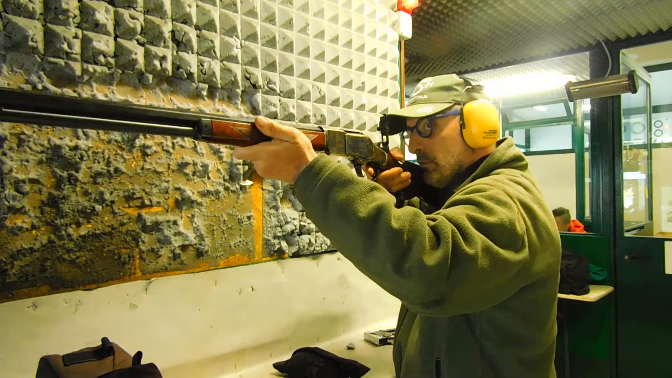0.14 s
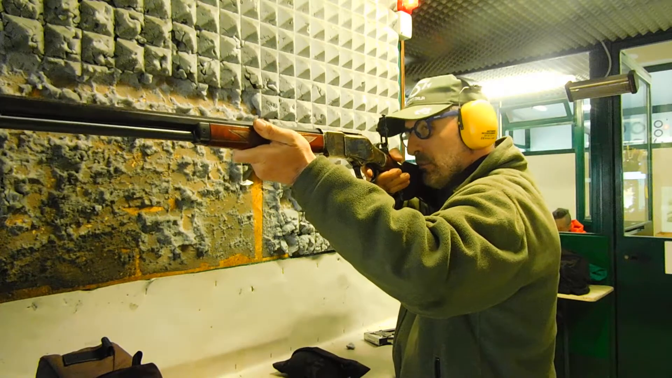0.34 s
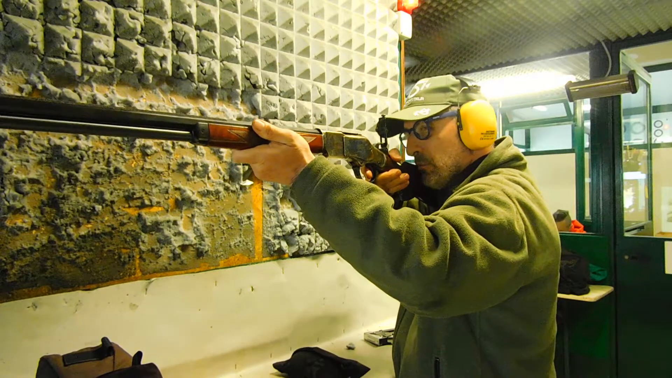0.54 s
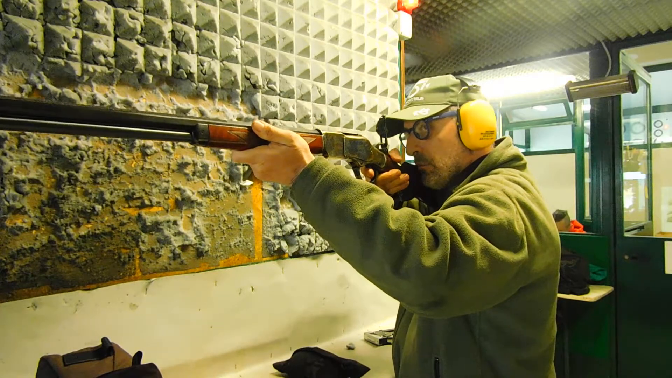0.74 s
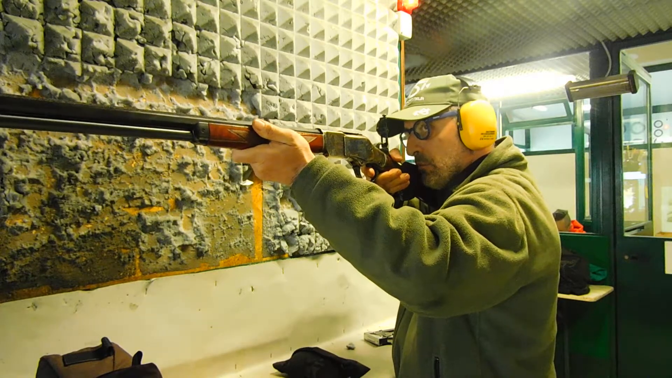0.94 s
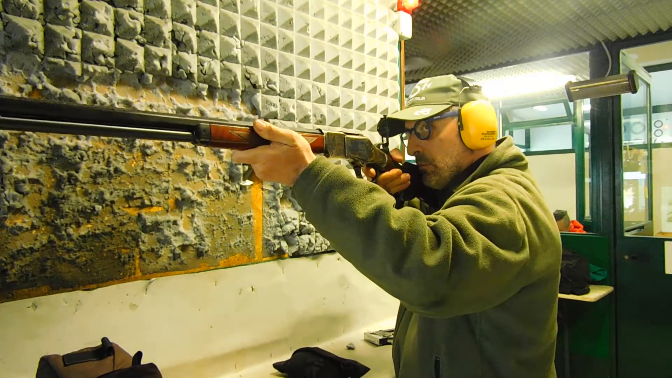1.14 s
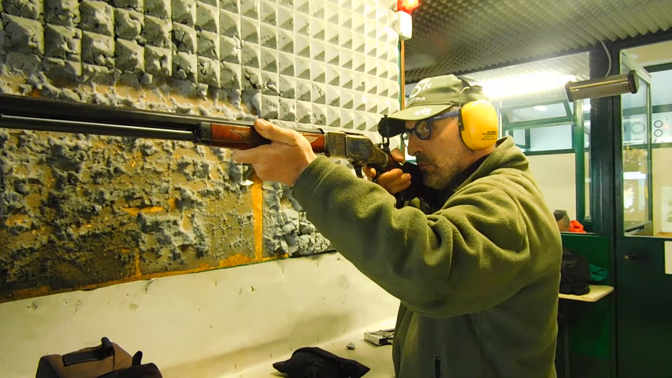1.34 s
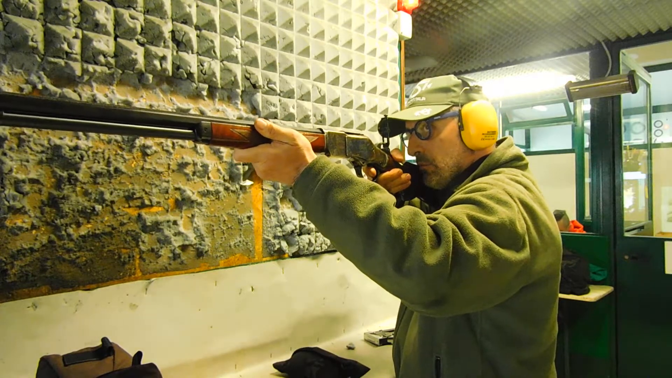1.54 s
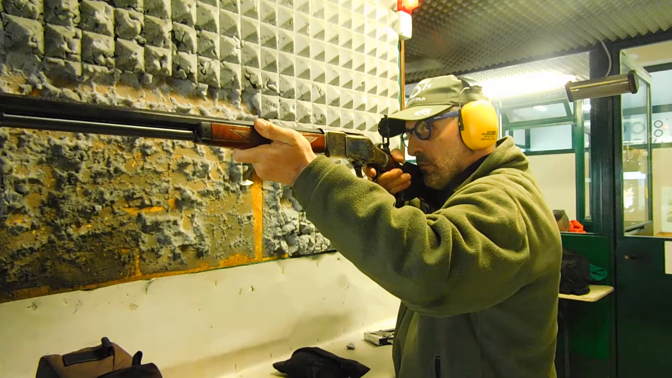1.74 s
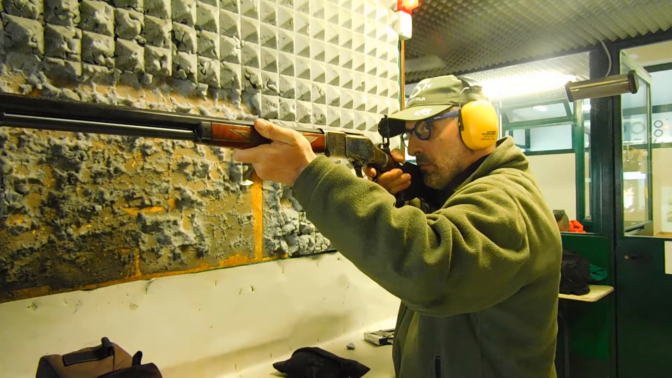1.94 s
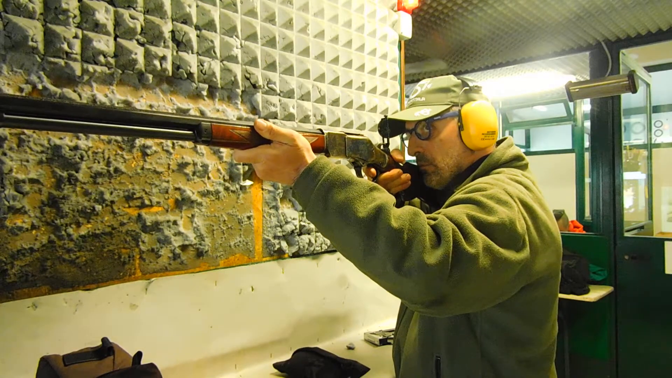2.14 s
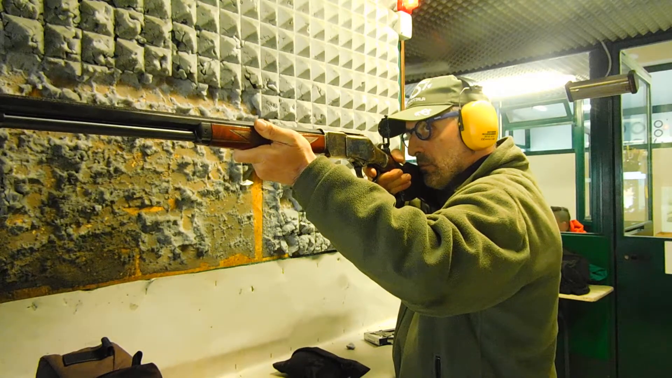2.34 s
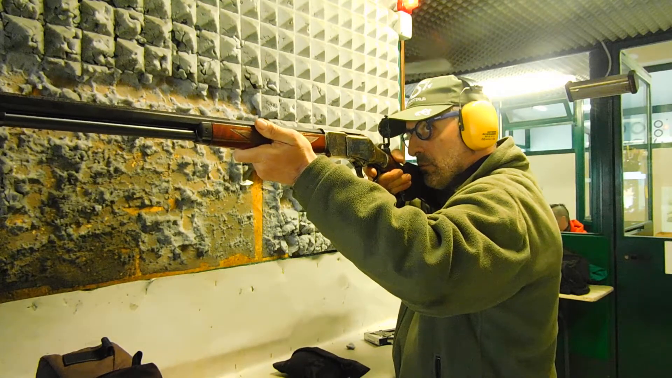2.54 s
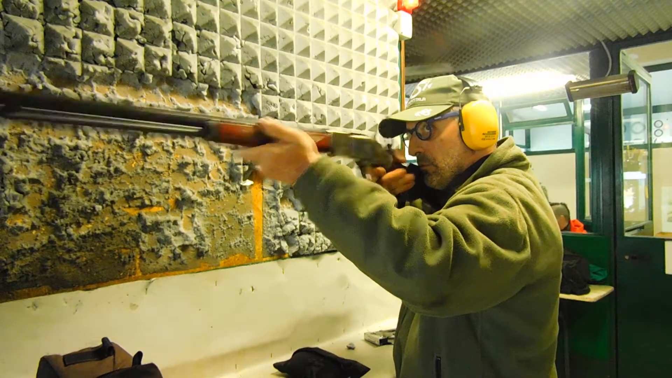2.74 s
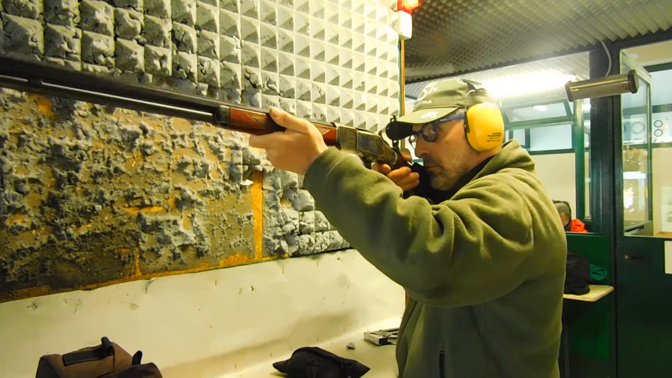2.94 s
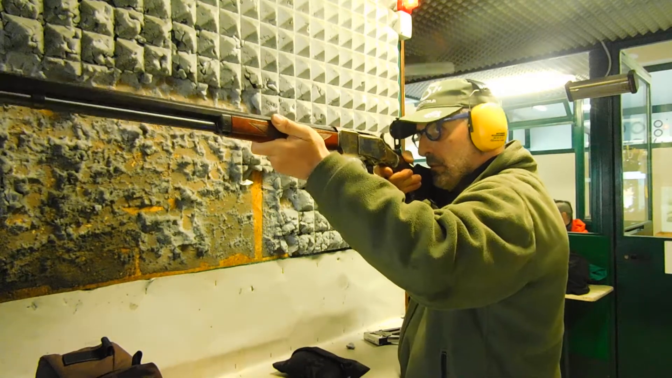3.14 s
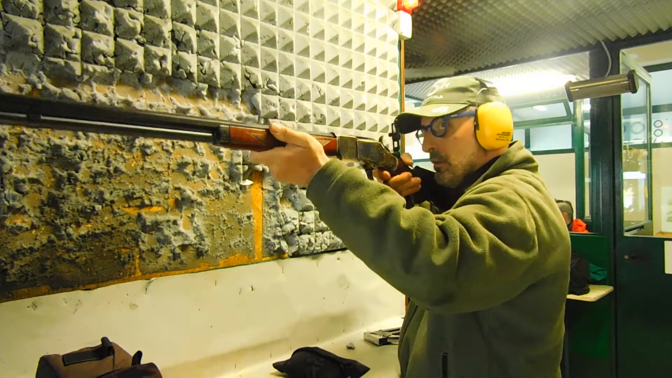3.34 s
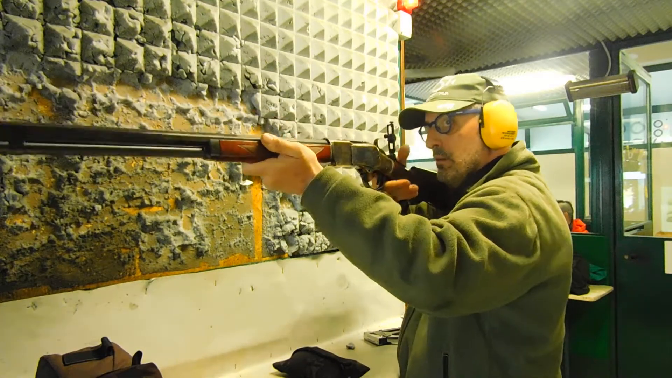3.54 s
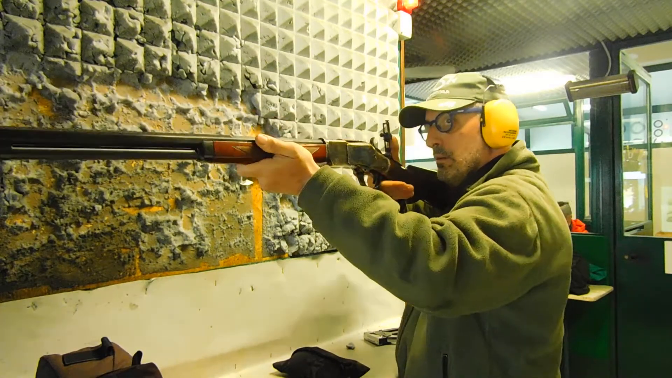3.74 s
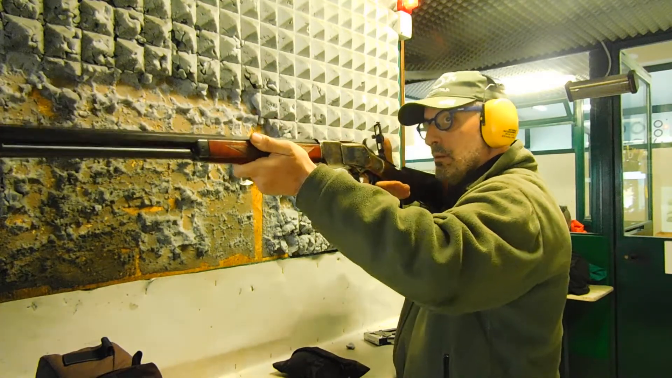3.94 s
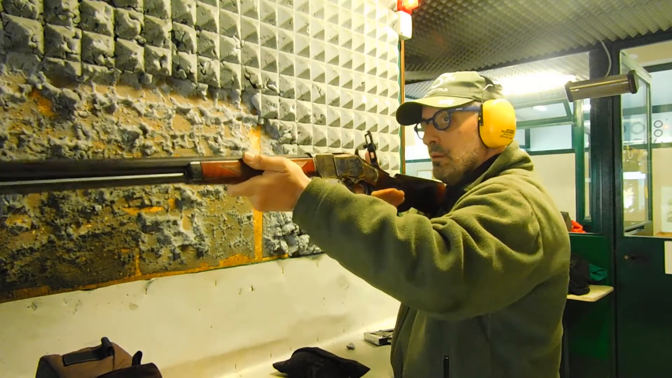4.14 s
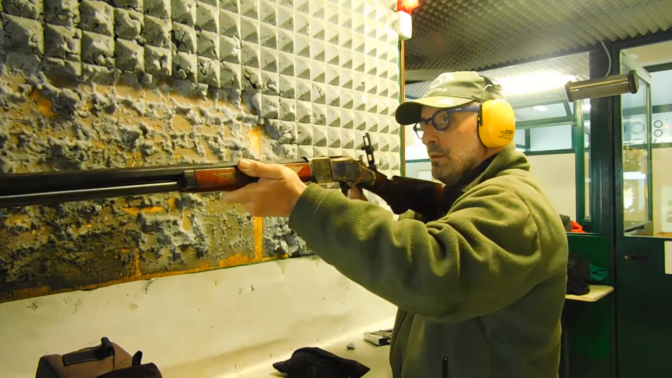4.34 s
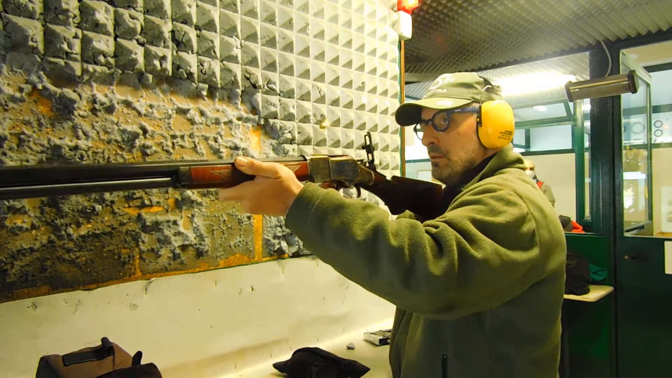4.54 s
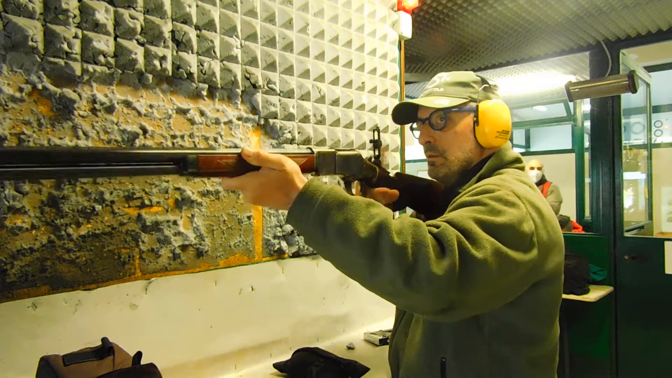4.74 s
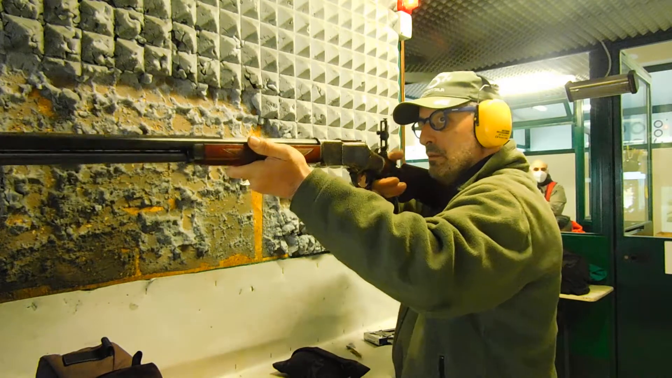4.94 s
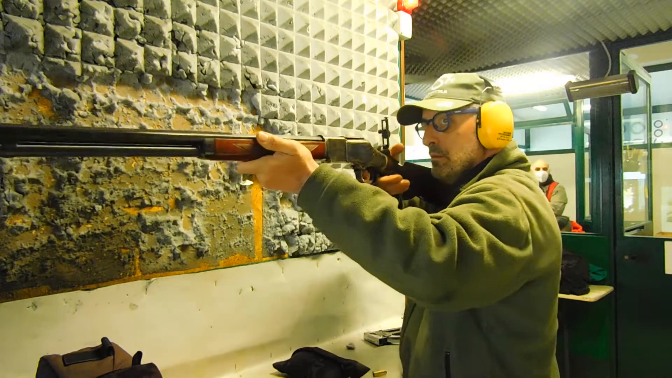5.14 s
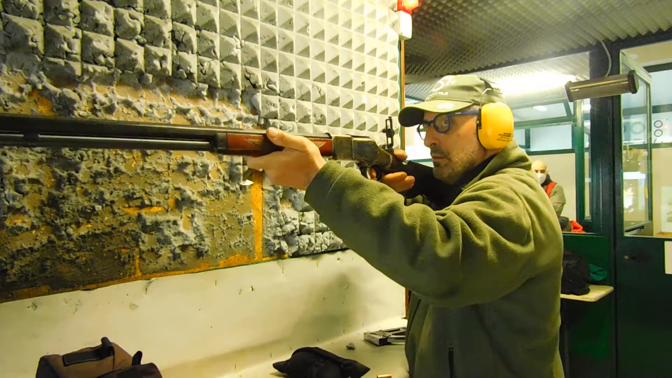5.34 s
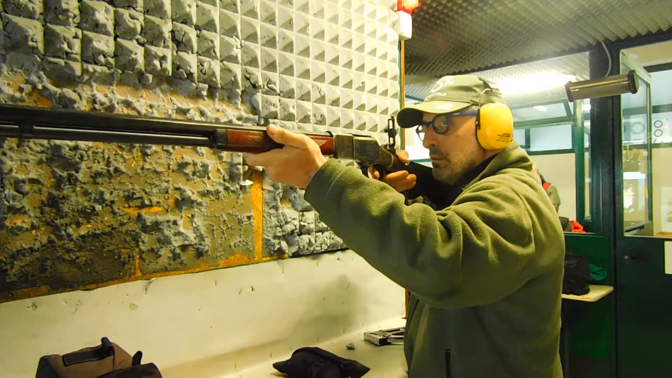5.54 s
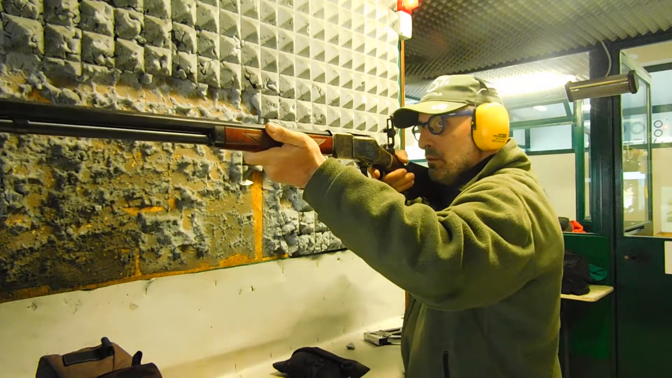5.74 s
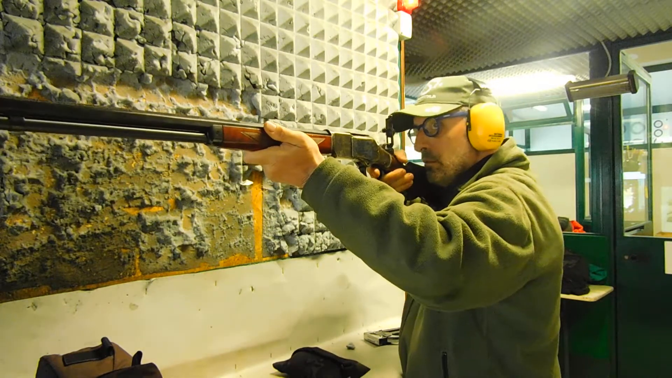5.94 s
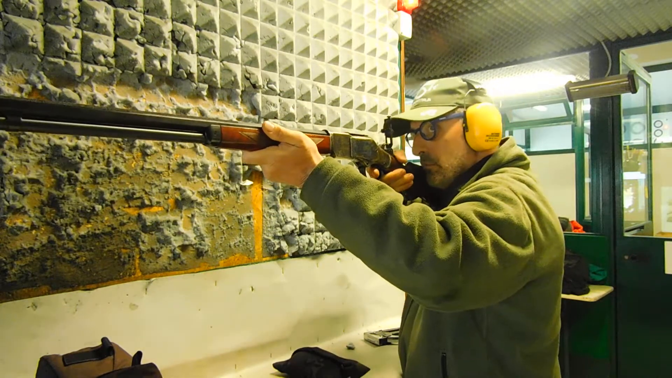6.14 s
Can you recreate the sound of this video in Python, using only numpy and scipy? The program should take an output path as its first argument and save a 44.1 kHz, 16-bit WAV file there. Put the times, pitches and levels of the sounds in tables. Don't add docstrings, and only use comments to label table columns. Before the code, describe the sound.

Lever-action rifle fires very close in an echoing indoor range, overloading the microphone; a duller distant shot precedes it, steel lever clacks follow.

```python
import sys
import numpy as np
from scipy import signal
from scipy.fft import rfft, irfft
from scipy.io import wavfile
from scipy.ndimage import uniform_filter1d

SR = 44100
rng = np.random.default_rng(int(sys.argv[2]) if len(sys.argv) > 2 else 0)


def generate_wav(signal):
    frames = np.transpose(np.atleast_2d(signal))
    scaled = np.clip(frames, -1, 1) * 32767
    pcm = np.round(scaled).astype(np.int16)
    wavfile.write(sys.argv[1], SR, pcm)


def natural_amplitude(level_db):
    exponent = np.asarray(level_db, float) / 20
    return 10 ** exponent


N = 272538

# pitch_hz, level_db per Hz
AIR_COLOUR = [(22, -31.5), (34, -8), (45, 14.5), (60, -12), (120, -4), (250, -4.5), (400, -6.5), (700, -12),
              (1100, -15), (1700, -22.5), (3000, -37.5), (5000, -50), (8000, -61), (16000, -80)]
# pitch_hz, width_hz, level_db
DUCT_HUMS = [(44.7, 27, -57), (103, 6.7, -55.5), (165.5, 10.4, -44)]
# pitch_hz, likeness_0_to_1
LIKENESS = [(60, 1.0), (130, 1.0), (290, 0.96), (640, 0.78), (1410, 0.79), (3100, 0.53), (6820, 0.4),
            (15000, 0.01)]
# pitch_hz, t60_s
TUNNEL_T60 = [(40, 2.24), (150, 1.35), (500, 1.22), (1200, 1.138), (3000, 1.03), (8000, 0.88),
              (16000, 1.75)]
# pitch_hz, level_db per Hz
FAR_COLOUR = [(18, -22.5), (40, -8.5), (161, 4.5), (345, -7), (1100, -10), (2120, -20.5), (6050, -55.5),
              (16000, -80.5)]
# pitch_hz, level_db per Hz
NEAR_COLOUR = [(20, -28.5), (45, -8.5), (100, -13.5), (160, -7.5), (260, -17.5), (560, -12.5), (800, -8.5),
               (1130, -8), (1600, -15), (2500, -23), (4000, -32.5), (6700, -51), (16000, -65.5)]
# pitch_hz, level_db per Hz
CLATTER_COLOUR = [(300, -29), (900, 8.5), (1800, 4.5), (2600, 8.5), (4000, -11), (6200, -17.5), (7500, -49),
                  (16000, -59)]
# start_s, level_db, tilt_db per octave, build_up_ms, share of tunnel t60
FAR_SHOTS = [
    (1.383, -25, 1.5, 3.2, 0.64),
    (1.4015, -12, 5, 1.206, 0.3027),
    (1.402, -14, 3, 15, 1.0),
    (2.44, -28.5, 1.5, 65, 0.88),
]
NEAR_SHOT = [
    (2.77, 8.5, 1.76, 6, 0.52),
    (2.929, 0.5, 0.031, 1.5, 0.88),
    (3.091, -7, -1.7, 3, 0.38),
    (3.348, -14.5, 0.45, 27, 0.34),
]
# start_s, level_db
HARD_ECHOES = [
    (3.019, 0),
    (3.052, -3),
    (3.07, -6),
    (3.091, -10),
    (3.23, -21.5),
    (3.41, -27),
]
# start_s, level_db, tilt_db per octave
FAR_CLATTER = [
    (5.099, -39.5, -8),
    (5.201, -42.5, 2),
    (5.438, -45, 0),
    (5.679, -44, -3),
    (5.79, -56, -3.5),
]
# start_s, peak_db, pitch_hz
BENCH_KNOCKS = [(0.146, -21.5, 343), (0.149, -35.5, 1200), (.150, -53, 3462), (0.159, -29.5, 103),
                (0.19, -25, 354), (0.341, -29, 944.6), (.345, -46, 2113), (0.483, -41, 1458),
                (0.546, -43, 910), (5.203, -31.5, 2480), (5.959, -30.5, 801.1), (5.963, -33, 400)]
# start_s, peak_db, pitch_hz
BENCH_TAPS = [
    (3.265, -43.5, 5500),
    (3.299, -25.5, 4259),
    (3.321, -38.5, 4240),
    (5.052, -18, 1060),
    (5.052, -21, 420),
    (5.051, -28.5, 2030),
    (5.181, -31, 1020),
]
# start_s, pressure, length_ms
SHOCK_FRONTS = [
    (2.7701, 1, .2),
    (2.7703, -9, .4),
    (2.7707, 6, .3),
    (2.9182, -27, .5),
    (2.9314, 14, .5),
    (2.9325, -12, .3),
]
# start_s, length_ms, push (sign is direction)
PRESSURE_SURGES = [(2.7710, 10.5, -1), (2.7865, 2, -1), (2.7915, 3.5, -1), (2.7970, 4.5, -1),
                   (2.8050, 3.5, -1), (2.8095, 4.5, -1), (2.8175, 1.5, -1), (2.8235, 5.2, -1),
                   (2.8325, 5, -1), (2.8445, 1.5, 1), (2.8520, 3, -1), (2.8680, 3.5, -1), (2.8800, 2.5, -1),
                   (2.8915, 2.5, -1), (2.9070, 13, .3), (2.9178, 13.5, 1.4), (2.9380, 4.5, -1)]
# start_s, peak_db, stock_share_db, hardness_db
LEVER_CLACKS = [(4.2957, -13, -7.5, 4.5), (4.4138, -14.5, -10, -0.5), (4.4283, -2.5, -10, 0),
                (4.443, -5, -19, 0), (4.4526, -5, -10, 4), (4.4623, -12, -13.5, -6),
                (4.5321, -33, -10, -4.5), (4.6582, -37.5, 5, -4), (4.7023, -24, -13, -3.5),
                (4.713, 0, -34, -3), (4.7243, -13.5, -15, -5.5), (4.7449, -21.5, -11.5, 0),
                (4.7548, -7, -17, 5), (4.7675, -1.5, -6, 8.5), (4.7726, -12, -1.5, 0.5),
                (4.799, -18, 12, -0.5), (4.8095, -10, 0.5, 2.5), (4.8254, -11.5, -15, 4.5),
                (4.837, -14, 1, -3.5), (4.8466, -13.5, 17, -5.5), (4.8874, -12.5, 9, -3),
                (5.0503, -17, 21, 1), (5.179, -29, 1.5, 0.5)]
# start_s, length_s, level_db, sag_db, rasp_db
BOLT_STROKES = [
    (4.426, 0.056, -22, -7.5, -22),
    (4.708, 0.00355, -21.5, -4.5, -31),
    (4.754, 0.076, -17.5, -2, -17),
]
# start_s, level_db
CASE_TAPS = [
    (4.443, -46),
    (4.454, -35),
    (4.533, -62),
]
# pitch_hz, level_db, t60_s
STEEL_RING = [(1600, 0, .02), (1800, -4, .014), (2455, 3, .04), (2790, -7, .012), (3200, -10, .01),
              (3600, -7, .012), (4120, -10, .01), (4700, -8, .013), (5900, -15, .009)]
# pitch_hz, level_db, t60_s
WOOD_RING = [(745, -32, 0.028), (990, 8.5, 0.017), (1270, 2, 0.0062)]
# pitch_hz, level_db, t60_s
BRASS_RING = [(4690, -4, .05), (4760, -17, .22), (4820, -19, .2), (7903, -1, .04), (7860, -30, .08),
              (11350, -20, .14)]
# pitch_hz, level_db per Hz
CONTACT_COLOUR = [(300, -44), (600, -20), (1000, -2), (2200, -0.5), (3500, -6.5), (5500, -9.5), (8000, -21),
                  (11500, -24), (16000, -32.5)]

TIME = np.arange(N) / SR
HZ = np.maximum(np.arange(N // 2 + 1) * SR / N, 1)
BANDS = 25 * 2 ** (np.arange(20) / 2)
WHITE = rng.standard_normal((2, N // 2 + 1)) + 1j * rng.standard_normal((2, N // 2 + 1))

AIR_LEVEL_DB = -38.5
COARSE = 16
LATE_CYCLES = 0.83
SLAP_TILT_DB, SLAP_MS, SLAP_SHARE = 4, 0.73, 0.025
CLATTER_MS, CLATTER_SHARE = 2.8, 1
KNOCK_T60_S, TAP_T60_S = 0.18, 0.063
KNOCK_SLOPE = -0.2
SURGE_BASE, SURGE_PER_MS = 11, 2.5
BURST_T60_S = 0.02944
RING_PER_DB = -0.2886
GRIP_S, LET_GO_S, IDLE_DB = 0.022, 0.034, -18.5
RASP_HZ, RASP_WIDTH_HZ = 11300, 1700
TUMBLE_HZ, TUMBLE_DB = 70, 2.2
LEVER_PAN_DB = 0.5
PORT_LAG = 1
SHELF_HZ, SHELF_DB, LOW_CUT_HZ = 900, -19, 30
RAIL = 4.5
HISS_HZ, TOP_HZ = 9080, 16000


def on_log(table, hz):
    pitch, value = np.array(table)[:, :2].T
    return np.interp(np.log(hz), np.log(pitch), value)


def unit(x):
    return x / np.sqrt(np.mean(x ** 2))


def walk(rate):
    hold = int(SR / rate)
    steps = np.repeat(rng.standard_normal(N // hold + 1), hold)
    return 2.18 * uniform_filter1d(uniform_filter1d(steps, hold), hold)[:N]


def fade(time, rise, t60):
    age = np.maximum(time, 0)
    return (1 - np.exp(-age / rise)) * natural_amplitude(-60 * np.minimum(age / t60, 3))


def microphone(hz):
    shelf, cut = 1j * hz / SHELF_HZ, 1j * hz / LOW_CUT_HZ
    bass_shelf = (shelf + natural_amplitude(SHELF_DB)) / (shelf + 1)
    return bass_shelf * cut / (cut + 1) * 4 * cut / (4 * cut + 1)


def band(hz, width, size=N):
    bins = np.maximum(np.arange(size // 2 + 1) * SR / size, 1)
    near = np.flatnonzero(abs(bins - hz) < 4 * width)
    shape = np.exp(-((bins[near] - hz) / width) ** 2) / abs(microphone(bins[near]))
    spectrum = np.zeros((2, len(bins)), complex)
    spectrum[:, near] = shape * WHITE[:, (near + rng.integers(N)) % len(HZ)]
    mid, side = irfft(spectrum, size) * size / np.sqrt(5 * width * size / SR)
    alike = np.clip((on_log(LIKENESS, hz) - 0.3) / 0.54, 0, 0.99)
    return np.sqrt(1 + alike) * mid + np.sqrt(1 - alike) * side * np.array([[1], [-1]])


def band_shares(colour):
    power = natural_amplitude(2 * on_log(colour, BANDS)) * BANDS
    return 10 * np.log10(power / power.sum())


def roll(events, hz):
    power = 0
    for start, db, tilt, ms, share in events:
        rise = ms / 1000 + LATE_CYCLES / hz
        shape = fade(TIME[::COARSE] - start, rise, share * on_log(TUNNEL_T60, hz))
        power = power + (natural_amplitude(db + tilt * np.log2(hz / 1000)) * shape) ** 2
    return power


def tunnel():
    swell, slap = walk(1.24), walk(90)
    near = [*NEAR_SHOT, *((start, db, SLAP_TILT_DB, SLAP_MS, SLAP_SHARE) for start, db in HARD_ECHOES)]
    clatter = [(*row, CLATTER_MS, CLATTER_SHARE) for row in FAR_CLATTER]
    groups = (FAR_SHOTS, near, clatter)
    colours = (AIR_COLOUR, FAR_COLOUR, NEAR_COLOUR, CLATTER_COLOUR)
    out = 0
    for hz, air_db, *share_db in zip(BANDS, *map(band_shares, colours)):
        air = natural_amplitude(AIR_LEVEL_DB + air_db + 0.52 * swell + walk(8.9))
        power = sum(roll(events, hz) * natural_amplitude(2 * db) for events, db in zip(groups, share_db))
        echo = np.sqrt(np.interp(TIME, TIME[::COARSE], power))
        echo = echo * natural_amplitude(0.36 * slap + walk(25.23))
        out = out + np.hypot(air, echo) * band(hz, hz / 3.6)
    for hz, width, db in DUCT_HUMS:
        out = out + natural_amplitude(db + 0.7 * walk(2.965)) * band(hz, width)
    return out


def knocks():
    out, span = np.zeros((2, N + SR)), SR // 2
    for rows, t60 in ((BENCH_KNOCKS, KNOCK_T60_S), (BENCH_TAPS, TAP_T60_S)):
        for start, db, hz in rows:
            at = int(start * SR)
            shape = fade(TIME[:span], 0.0009, t60 * (hz / 1000) ** KNOCK_SLOPE)
            out[:, at:at + span] += natural_amplitude(db - 3.5) * shape * band(hz, hz / 2.5, size=span)
    return out[:, :N]


def half_wave(start, ms):
    return np.sin(np.pi * np.clip((TIME - start) * 1000 / ms, 0, 1))


def blast():
    out = np.zeros(N)
    for start, pressure, ms in SHOCK_FRONTS:
        out += pressure * half_wave(start, ms)
    for start, ms, push in PRESSURE_SURGES:
        strength = SURGE_BASE + SURGE_PER_MS * ms
        out += push * strength * np.sqrt(abs(half_wave(start, ms)))
    return out


def modes(table, scatter):
    hz, db, t60 = np.transpose(table)[:, :, None]
    age = TIME[:SR // 4]
    level_chance, pitch_chance = scatter * rng.standard_normal((2, len(table), 1))
    level = natural_amplitude(db + 2.5 * level_chance - 60 * age / t60)
    return np.sum(level * np.sin(2 * np.pi * hz * (1 + 0.01 * pitch_chance) * age), axis=0)


def contact(force, body_db, bright_db, scatter=1):
    size = len(force)
    hz = np.maximum(np.arange(size // 2 + 1) * SR / size, 1)
    steel = natural_amplitude(-35.5 + RING_PER_DB * bright_db) * modes(STEEL_RING, scatter)
    wood = natural_amplitude(body_db - 41.5) * modes(WOOD_RING, scatter)
    treble = bright_db * np.clip(np.log2(hz / 4000), 0, 1)
    snap = natural_amplitude(on_log(CONTACT_COLOUR, hz) + treble)
    return irfft(rfft(force) * (rfft(steel + wood, size) + snap), size)


def stroke(start, length, db, sag_db):
    times = [-GRIP_S, 0, length, length + LET_GO_S]
    levels = [IDLE_DB, 0, sag_db, sag_db + IDLE_DB]
    return natural_amplitude(db + np.interp(TIME - start, times, levels, -120, -120))


def lever():
    grit = unit(rng.standard_normal(N + SR) * natural_amplitude(rng.exponential(size=N + SR)))
    out, span = np.zeros(N + SR), SR // 4
    for start, db, body_db, bright_db in LEVER_CLACKS:
        at = int((start - 0.011) * SR)
        force = fade(TIME[:span] - 0.01, 0.0025, BURST_T60_S) * grit[at:at + span]
        clack = contact(force, body_db, bright_db)
        out[at:at + span] += natural_amplitude(db - 2.5) * clack / abs(clack).max()
    for start, db in CASE_TAPS:
        at = int(start * SR)
        tumble = TUMBLE_DB * walk(TUMBLE_HZ)[:span]
        out[at:at + span] += natural_amplitude(db + 15 + tumble) * modes(BRASS_RING, 0)
    rattle = rasp = 0
    for *motion, rasp_db in BOLT_STROKES:
        force = stroke(*motion)
        rattle = rattle + force
        rasp = rasp + force * natural_amplitude(rasp_db)
    chatter = natural_amplitude(1.5 * walk(200)) * grit[:N]
    slide = contact(rattle * natural_amplitude(3) * chatter, 0, 0, scatter=0)
    fine = signal.lfilter(*signal.iirpeak(RASP_HZ, RASP_HZ / RASP_WIDTH_HZ, fs=SR), chatter * rasp)
    return out[:N] + slide + natural_amplitude(-9) * fine


def booth(x):
    age = np.arange(SR // 2) / SR
    level = natural_amplitude(-23.5 - 60 * age / 0.015) + natural_amplitude(-57.5 - 60 * age / 0.5)
    tail = signal.lfilter([0.8], [1, -0.1], rng.standard_normal((2, len(age))) * level)
    tail[:, 0] = 0.93
    return signal.fftconvolve(x[None], tail, axes=1)[:, :N]


def scene():
    pan = natural_amplitude(LEVER_PAN_DB * np.array([[0.5], [-0.5]]))
    left, right = blast() + booth(lever()) * pan
    near = np.array([left, np.roll(right, PORT_LAG)])
    return tunnel() + knocks() + near


def band_limit(x):
    return signal.sosfilt(signal.butter(12, 16190, fs=SR, output="sos"), x)


def record(dry):
    pinned = dry / (1 + abs(dry / RAIL) ** 1.3) ** (1 / 1.3)
    hiss = signal.lfilter(*signal.butter(1, HISS_HZ, "high", fs=SR), rng.standard_normal(dry.shape))
    heard = irfft(rfft(pinned) * microphone(HZ), N) + natural_amplitude(-65) * hiss
    heard = signal.sosfilt(signal.ellip(10, 0.3, 60, TOP_HZ, fs=SR, output="sos"), heard)
    return band_limit(np.clip(heard, -1, 1))


dry = scene()
out = record(dry)
generate_wav(out)
```